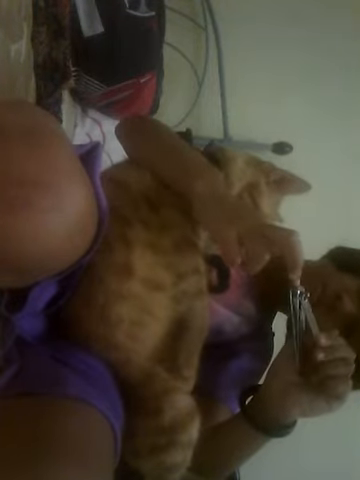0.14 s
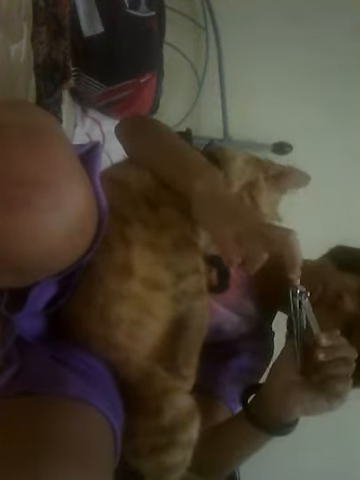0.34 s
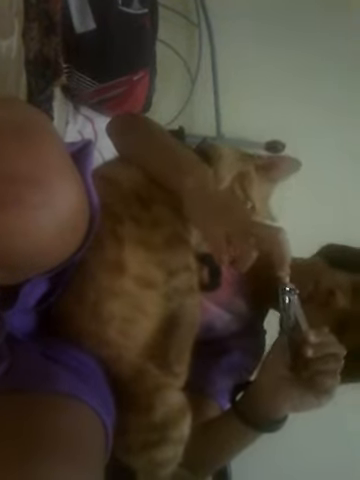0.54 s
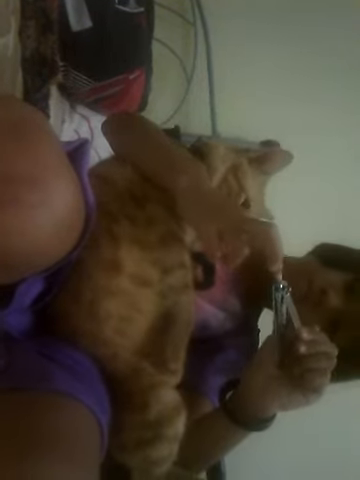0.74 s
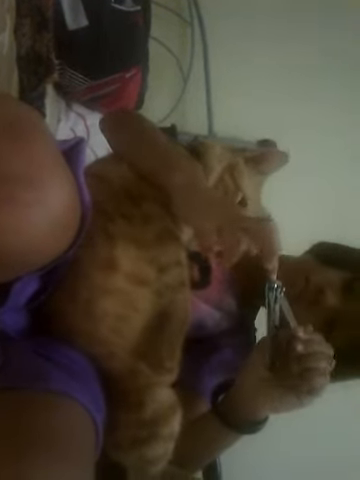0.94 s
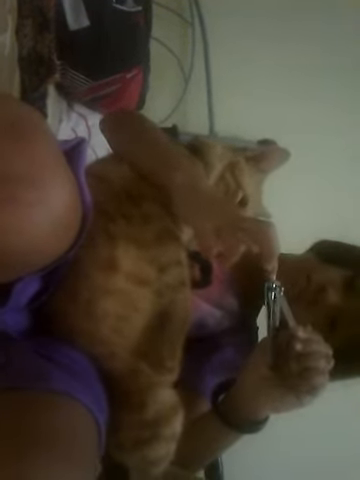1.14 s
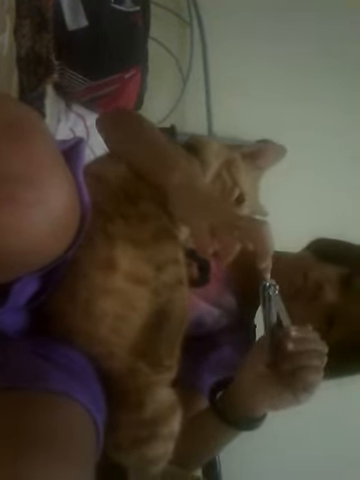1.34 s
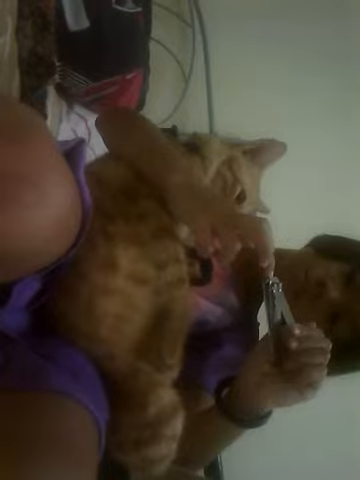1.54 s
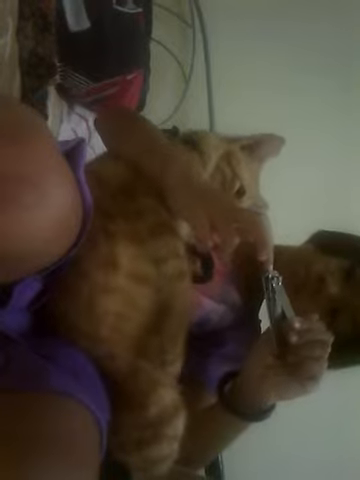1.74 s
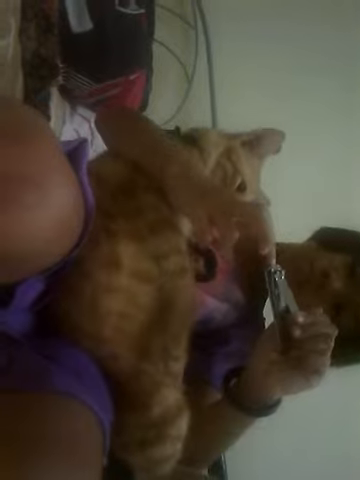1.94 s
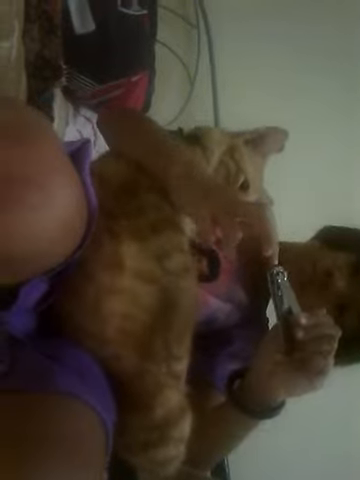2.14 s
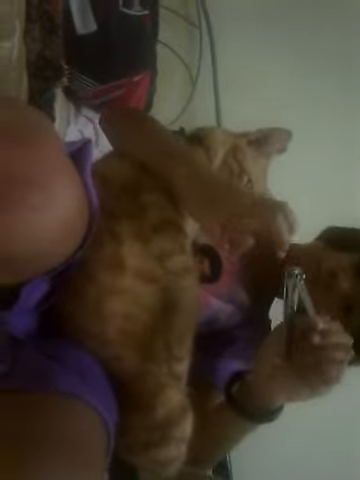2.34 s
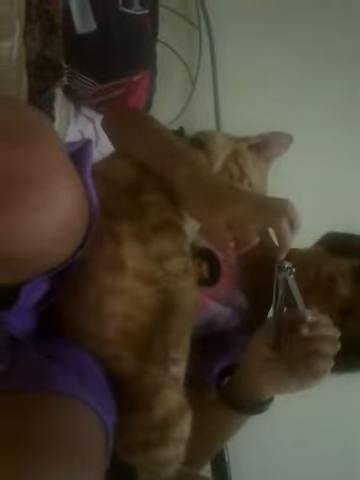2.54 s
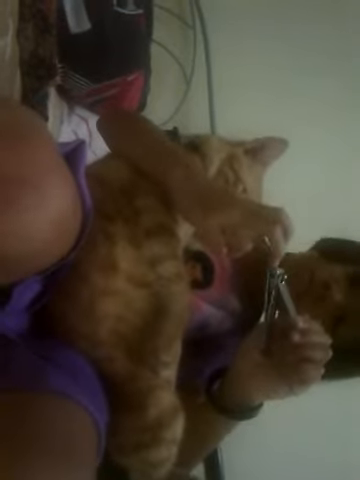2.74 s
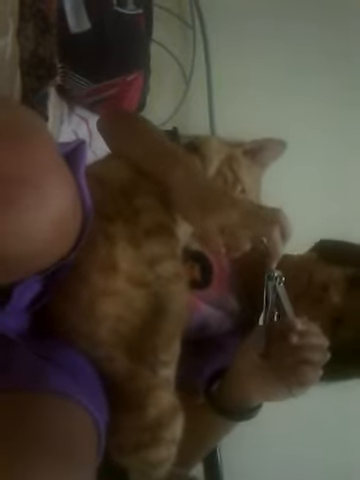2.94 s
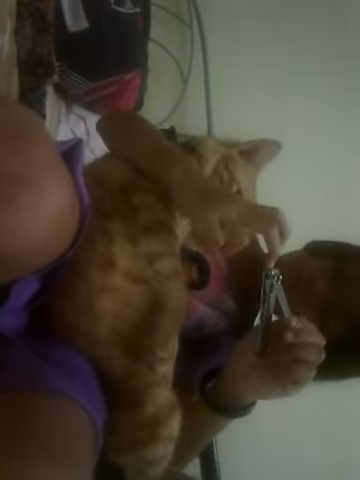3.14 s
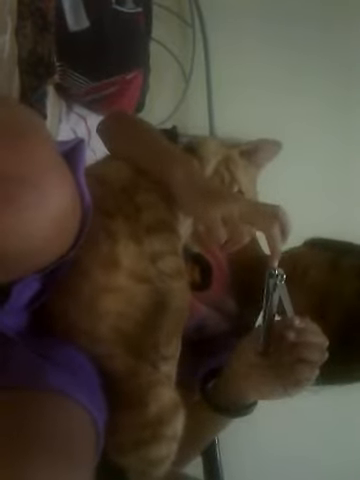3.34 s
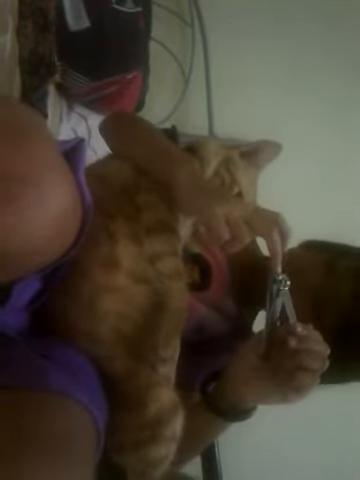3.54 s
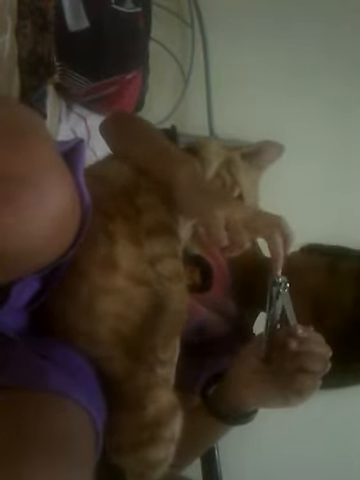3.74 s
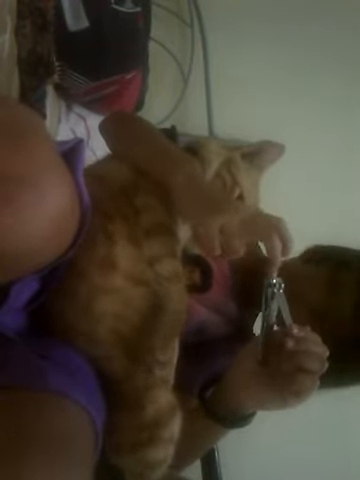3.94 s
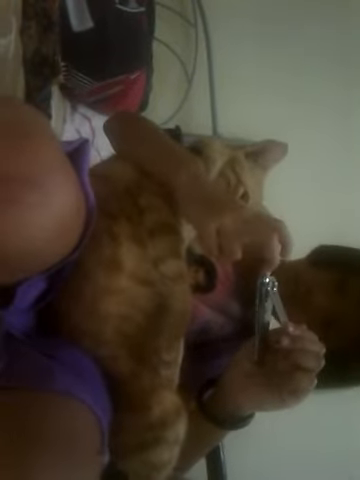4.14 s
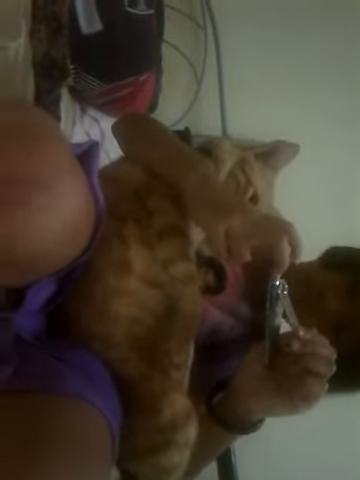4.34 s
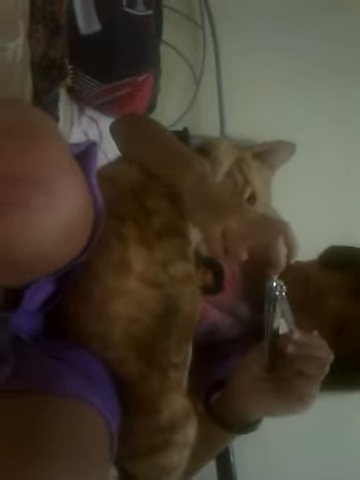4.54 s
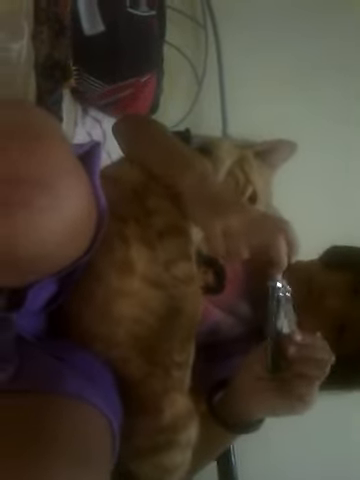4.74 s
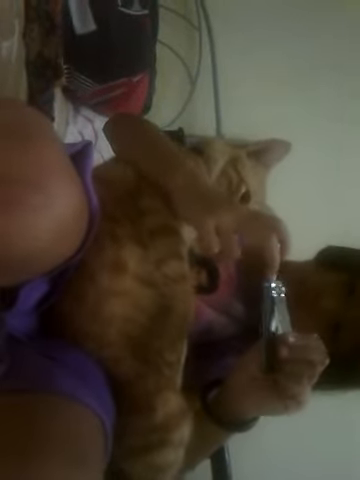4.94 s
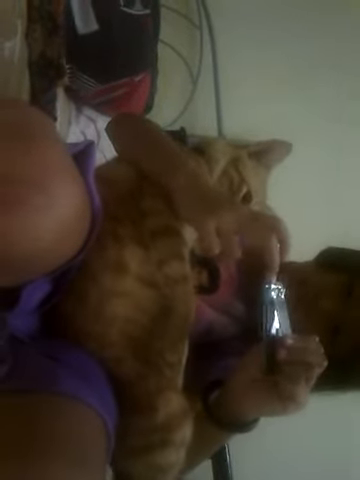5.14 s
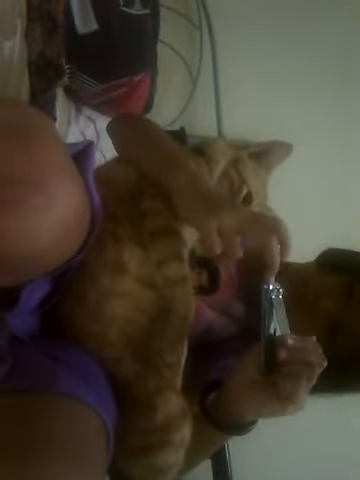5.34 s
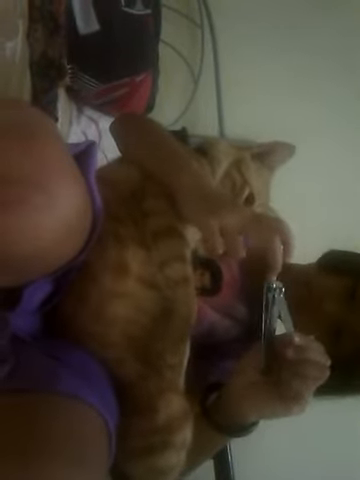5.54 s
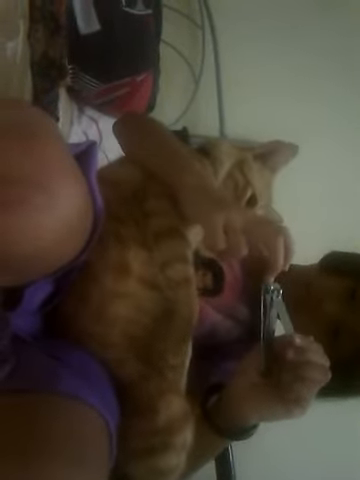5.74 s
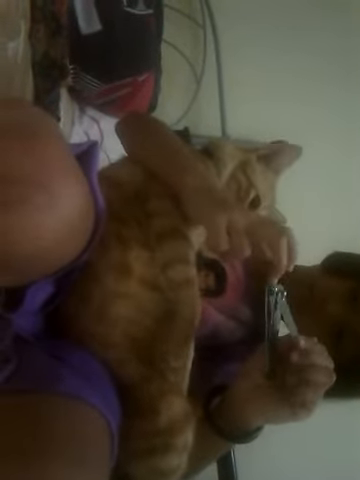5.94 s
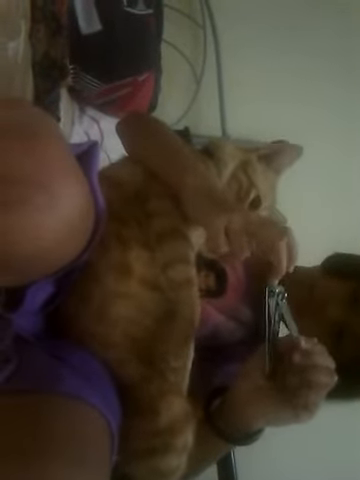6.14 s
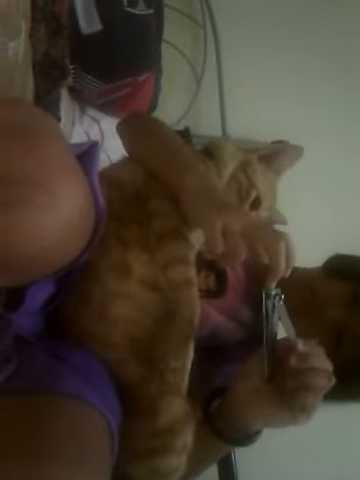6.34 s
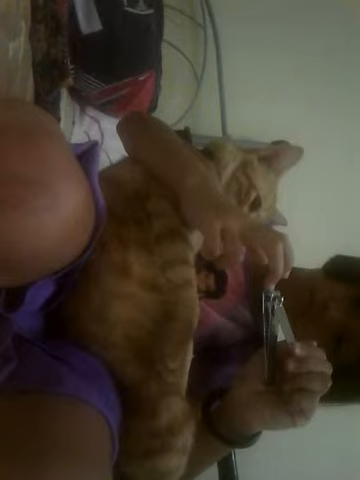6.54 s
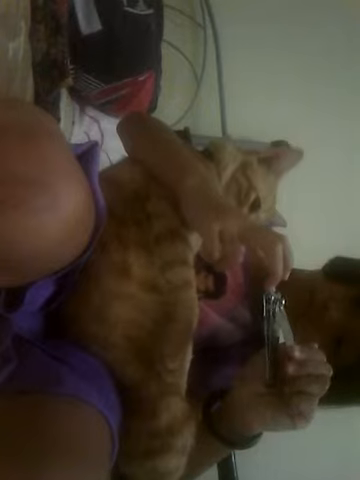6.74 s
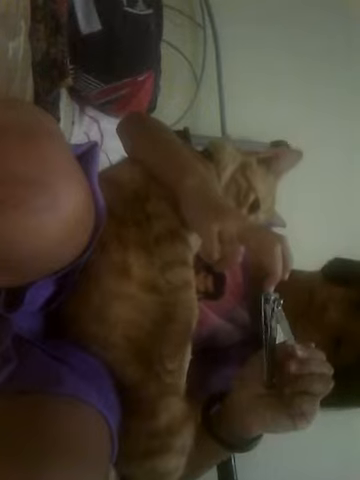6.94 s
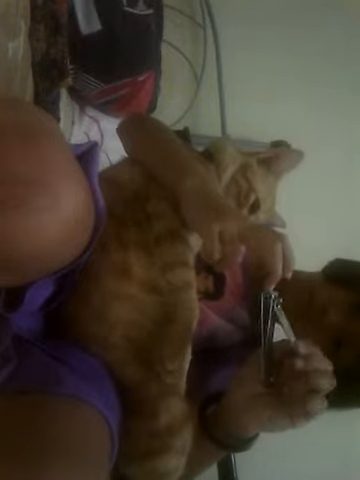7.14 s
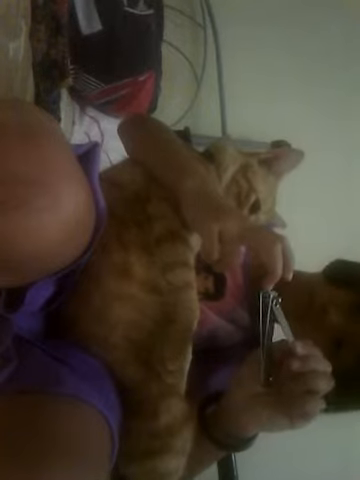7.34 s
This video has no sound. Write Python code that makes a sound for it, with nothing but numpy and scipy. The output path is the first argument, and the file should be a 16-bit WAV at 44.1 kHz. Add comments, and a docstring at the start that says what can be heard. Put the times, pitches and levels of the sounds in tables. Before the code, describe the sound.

Close to the microphone in a bare, echoing room, a steel nail clipper ticks faintly, then snaps hard through a claw. Its lever clacks twice straight after. Quiet scrapes and grip rustles follow until a second, louder snip, one clack and scattered light ticks. A soft fur brush ends it over faint hum.

```python
"""A steel lever clipper cuts two of a cat's claws in a bare, ringing room: damped steel modes swell as each claw gives.
The lever clacks with a ping, chatter and rebound; steel scrapes, brushed fur and grip shifts are coloured grains.
Behind lie faint blurred chirps, a noise rush and a fan's wavering hum; decaying echoes answer snips and clacks.
The camera's noise gate follows the treble, holding the hum down and letting it swell around treble sounds."""
import sys
import numpy as np
from scipy import signal
from scipy.fft import rfft, irfft, next_fast_len
from scipy.io import wavfile
from scipy.ndimage import uniform_filter1d

SR = 44100
rng = np.random.default_rng(int(sys.argv[2]) if len(sys.argv) > 2 else 0)


def generate_wav(signal):
    """Clip the signal to [-1, 1] and save it as 16-bit WAV at the path in sys.argv[1]."""
    frames = np.transpose(np.atleast_2d(signal))
    scaled = np.clip(frames, -1, 1) * 32767
    pcm = np.round(scaled).astype(np.int16)
    wavfile.write(sys.argv[1], SR, pcm)


N = 330436

# steel modes of the clipper: pitch_hz, width_hz, cut_db, knock_db
CLIPPER_MODES = [(3130, 250, -33, -51), (3670, 380, -24.5, -43), (4170, 160, -16, -17),
                 (5630, 820, -32, -22), (6550, 160, -25.5, -8.5), (7110, 170, -26, -4),
                 (7890, 440, -13, -7), (8400, 320, 0, -2), (9280, 420, -8, -4), (10480, 500, -19.5, -10),
                 (11480, 330, -17.5, -48), (12150, 630, -20, -11.5), (13260, 520, -19, 0.5),
                 (14170, 880, -23, -8), (14970, 570, -28.5, -39), (16000, 300, -33.5, -7.5)]


def undb(db):
    """Decibels to gain."""
    return 10 ** (np.asarray(db) / 20)


def unit(x):
    """Scale to rms 1."""
    return x / np.sqrt(np.mean(x ** 2))


def add(track, start_s, sound):
    """Mix a sound into the track at start_s."""
    i = max(int(start_s * SR), 0)
    track[i:i + len(sound)] += sound[:N - i]


def colour(x, points):
    """Shape the spectrum of x by (Hz, dB) points, interpolated over log frequency, at rms 1."""
    hz, db = np.transpose(points)
    size = next_fast_len(len(x), real=True)
    bins_hz = np.maximum(np.fft.rfftfreq(size, 1 / SR), 1)
    gain = undb(np.interp(np.log(bins_hz), np.log(hz), db))
    return unit(irfft(rfft(x, size) * gain, size)[:len(x)])


def walk(n, knots_per_s):
    """Random wander at rms 1: straight lines between Gaussian knots."""
    place = np.arange(n) / SR * knots_per_s
    knots = rng.standard_normal(1024)
    return unit(np.interp(place, np.arange(len(knots)), knots))


def grains(n, spread_db):
    """Dense tiny clicks of very unequal size, at rms 1."""
    size = undb(spread_db * rng.standard_normal(n))
    return unit(rng.standard_normal(n) * size)


def ring(modes):
    """Sum (Hz, width Hz, dB) modes after one blow; the hand damps them within milliseconds."""
    hz, width_hz, db = np.transpose(modes)[:, :, None]
    t = np.arange(1024) / SR
    side = (-1) ** np.arange(len(hz))[:, None]  # neighbouring modes swing in opposite senses
    decay = np.exp(-np.pi * width_hz * t)
    return np.sum(side * width_hz * undb(db) * decay * np.sin(2 * np.pi * hz * t), axis=0)


def clipper(strength_db, tilt_db_per_octave):
    """Ring the steel; a harder contact tilts it towards the treble."""
    hz, width_hz = np.transpose(CLIPPER_MODES)[:2]
    tilted_db = strength_db + tilt_db_per_octave * np.log2(hz / hz.mean())
    return ring(np.column_stack([hz, width_hz, tilted_db]))


def walls(t60_s=0.53, first_s=0.0045, build_s=0.0045, sparse_db=7, merge_s=0.076):
    """Answer after a short gap: separate echoes first, merging into a smooth decaying tail."""
    t = np.arange(SR // 2) / SR
    early = np.exp(-t / merge_s)
    separate = np.sqrt(early) * grains(len(t), sparse_db)
    smooth = np.sqrt(1 - early) * rng.standard_normal(len(t))
    late_s = np.maximum(t - first_s, 0)
    shape = (1 - np.exp(-late_s / build_s)) * np.exp(-np.log(1000) * late_s / t60_s)
    return (separate + smooth) * shape / shape.max()


def room(sound, echoes):
    """Play a ring through a train of echoes, keeping the train's level."""
    return signal.fftconvolve(echoes, sound / np.linalg.norm(sound))


def snips(echoes, evenness=.7, room_tilt_db=-0.3, crumble_db=-35, crumble_s=0.0061,
          claw_width_hz=1300, crack=0.13):
    """The claw gives way in about a millisecond, and the ring of the jaws swells meanwhile."""
    # claws cut through: start_s, snap_db, room_db, tilt_db_per_octave, fracture_ms, claw_hz, claw_db
    cuts = [(2.1247, -4.5, -31.5, 0, 0.62, 10150, -11), (5.2609, 0.5, -35.5, -0.5, 0.69, 13450, -9.5)]
    out, cut_db = np.zeros(N), np.array(CLIPPER_MODES)[:, 2]
    t = np.arange(1024) / SR
    for start_s, snap_db, room_db, tilt_db, fracture_ms, claw_hz, claw_db in cuts:
        swell = 1 - np.exp(-(1000 * t / fracture_ms) ** 2)
        snap = clipper(cut_db, tilt_db) * swell
        snap = snap / np.abs(snap).max()
        snap[:4] += crack * np.array([.5, .5, -0.66, -0.37])  # first split: a dry, wide-band crack
        add(out, start_s, undb(snap_db) * snap)
        # crumbling fibres and walls that gather sound from all sides bring out the modes more evenly
        steel = clipper(evenness * cut_db, tilt_db + room_tilt_db)
        spread = steel + ring([(claw_hz, claw_width_hz, claw_db)])
        fibres = grains(len(t), spread_db=3.5) * np.exp(-t / crumble_s)
        add(out, start_s, undb(snap_db + crumble_db) * room(spread, fibres))
        add(out, start_s, undb(room_db) * room(spread, echoes))
    return out


def clacks(echoes, chatter_s=0.0085, chatter=.07, tick=.45, unevenness_db=4):
    """The loose lever knocks on its pin with a dry tick, pings, chatters and rebounds once."""
    # lever knocks: start_s, peak_db, room_db, ping_hz (depends on where the lever is held)
    knocks = [(.004, -30.5, -51, 2620), (.182, -39.5, -63, 2500), (0.457, -37.5, -63.5, 1490),
              (2.1893, -11.5, -43, 2540), (2.2164, -12.5, -38, 2505), (5.3954, -17.5, -36.5, 3070),
              (5.474, -31, -60, 2560), (5.605, -32, -48, 3050), (6.337, -34.5, -50, 2380),
              (6.353, -38.5, -51, 2410), (6.42, -36.5, -48.5, 3000), (6.463, -37.5, -56, 3060),
              (6.667, -29.5, -40.5, 3040), (7.248, -39.5, -63, 3600)]
    ping_width_hz, ping_db = 56, -12.5
    bounce_s, bounce_db = .007, -7.5
    # a knock that fills the room more is harder and brighter: tilt per dB above the plain room level
    plain_room_db, tilt_per_db = -44, 0.35
    out, knock_db = np.zeros(N), np.array(CLIPPER_MODES)[:, 3]
    t = np.arange(512) / SR
    for start_s, peak_db, room_db, ping_hz in knocks:
        steel = clipper(knock_db, tilt_per_db * (room_db - plain_room_db))
        blow = steel + ring([(ping_hz, ping_width_hz, ping_db)])
        blow[:2] += tick * np.abs(blow).max() * np.array([1, -1])
        for delay_s, loss_db in [(0, 0), (bounce_s, bounce_db)]:
            contact = chatter * grains(len(t), unevenness_db) * np.exp(-t / chatter_s)
            contact[0] = 1
            knock = np.convolve(contact, blow)
            add(out, start_s + delay_s, undb(peak_db + loss_db) * knock / np.abs(knock).max())
        add(out, start_s, undb(room_db) * room(blow, echoes))
    return out


def strokes(table, rise, spectrum, grain_db, catch_db, catches_per_s):
    """Friction: tiny slips under a swell for each stroke, catching and letting go."""
    out, t = np.zeros(N), np.arange(-SR // 4, SR // 4) / SR
    share = np.clip(np.where(t < 0, rise, 1 - rise), .01, 1)
    for height_s, length_s, level_db in table:
        catching = undb(catch_db * walk(len(t), catches_per_s))
        slips = colour(grains(len(t), grain_db) * catching, spectrum)
        swell = np.exp(-.5 * (t / (share * length_s)) ** 2)
        add(out, height_s + t[0], undb(level_db) * slips * swell)
    return out


def scrapes():
    """Steel slides on claw in fine, bright slips."""
    # strokes: height_s, length_s, level_db
    slides = [(1.49, 0.078, -55.5), (1.905, 0.11, -56.5), (3.39, .075, -55.5), (3.56, 0.14, -57),
              (4.27, 0.21, -58.5), (4.40, 0.078, -55.5), (4.50, 0.14, -57.5), (4.635, 0.064, -57),
              (4.945, 0.17, -57), (5.20, 0.16, -52.5), (6.925, 0.082, -55.5), (7.37, 0.06, -57)]
    # spectrum: pitch_hz, density_db_per_hz
    spectrum = [(300, -14), (2000, -21.5), (5500, -23.5), (7000, -4.5), (8200, -2.5), (9400, 3),
                (10400, -19.5), (16000, -21.5)]
    return strokes(slides, 0.38, spectrum, grain_db=5.0, catch_db=0.75, catches_per_s=180)


def fur(swish_hz=6200):
    """Hairs slip under the fingers with a soft swish."""
    # strokes of the hand: height_s, length_s, level_db, rise_share
    brushes = [(2.768, .16, -55, 0.42), (4.286, 0.11, -61, 0.5), (5.764, 0.22, -63, .35),
               (7.393, 0.066, -44.5, 0.03)]
    # spectrum: multiple_of_swish_hz, density_db_per_hz
    swish = np.array([(.05, -35), (.3, -22), (.6, -13.5), (.82, -2.5), (1, -5.5), (1.2, -7.5), (1.5, -10),
                      (1.9, -27), (2.8, -49)]) * [swish_hz, 1]
    return sum(strokes([stroke], rise, swish, grain_db=6.5, catch_db=0.2, catches_per_s=310)
               for *stroke, rise in brushes)


def shifts():
    """The grip on the paw shifts in low, uneven slips."""
    # shifts: height_s, length_s, level_db
    grips = [(.70, 0.24, -51), (1.10, 0.12, -55), (2.59, 0.018, -52), (2.77, 0.39, -56.5),
             (4.39, 0.08, -46.5), (4.485, 0.091, -51), (4.905, 0.028, -52.5), (5.33, .3, -59.5),
             (6.33, 0.39, -58.5)]
    # spectrum: pitch_hz, density_db_per_hz
    spectrum = [(30, -22), (70, -9), (140, -2.5), (290, -2), (600, -10), (1200, -16), (2600, -25),
                (6000, -23.5), (10000, -20.5), (13000, -29), (16000, -28)]
    return strokes(grips, 0.35, spectrum, grain_db=6, catch_db=2.0, catches_per_s=180)


def chirps(blur_knots_per_s=500, width_s=.04, level_db=-63):
    """Thin far-off notes, blurred by the walls into narrow bands."""
    # notes: height_s, pitch_hz
    notes = [(.53, 3950), (1.61, 4680), (1.818, 4300), (2.041, 5010), (3.525, 3300), (3.66, 1450),
             (3.847, 4450), (5.9, 4500), (6.203, 1975)]
    out, t = np.zeros(N), np.arange(-SR // 8, SR // 8) / SR
    swell = np.exp(-(t / width_s) ** 2)
    for height_s, hz in notes:
        blur = walk(len(t), blur_knots_per_s) + 1j * walk(len(t), blur_knots_per_s)
        note = np.real(blur * np.exp(2j * np.pi * hz * t))
        add(out, height_s + t[0], undb(level_db) * swell * note)
    return out


def air(rush_db=-55, hum_hz=297.2, hum_db=-63.5):
    """Steady coloured-noise rush of the room with a fan's hum, its phase wandering."""
    # spectrum of the rush: pitch_hz, density_db_per_hz
    spectrum = [(25, -29.5), (45, -19), (70, -11), (130, -6), (260, -2.5), (370, -5), (480, -10),
                (700, -9.5), (1200, -17.5), (2100, -22.5), (4200, -21), (6500, -22), (8600, -18),
                (12000, -26.5), (16000, -31)]
    rush = colour(rng.standard_normal(N), spectrum)
    t = np.arange(N) / SR
    wander_rad = .7 * walk(N, knots_per_s=15)
    hum = np.sqrt(2) * np.sin(2 * np.pi * hum_hz * t + wander_rad)
    return undb(rush_db) * rush + undb(hum_db) * hum


def scene():
    """Clipper, hands and fur over chirps and the room's air."""
    echoes = walls()
    steel = snips(echoes) + clacks(echoes) + scrapes()
    hands = fur() + shifts()
    return (steel + hands + chirps() + air())[None]


def gate(x, shut_db=-60.0, span_db=11, depth_db=16.0, low_hz=2000, high_hz=11000, window_s=0.0093):
    """A soft noise gate: it follows the treble and turns everything down as that fades."""
    band_hz = [low_hz, min(high_hz, .45 * SR)]
    treble = signal.sosfilt(signal.butter(2, band_hz, "band", fs=SR, output="sos"), x)
    size = max(int(window_s * SR), 1)
    power = uniform_filter1d(treble ** 2, size, origin=size // 5)  # window set off-centre
    power_db = 10 * np.log10(np.maximum(power, 1e-12))
    opening = np.clip((power_db - shut_db) / span_db, 0, 1)
    return x * undb(-depth_db * np.cos(np.pi / 2 * opening) ** 2)


def record(dry):
    """The camera gates the sound, cuts the top and adds a tiny offset."""
    top_hz, offset = 15750, -.0004
    low_pass = signal.ellip(10, .2, 80, top_hz, fs=SR, output="sos")
    return signal.sosfilt(low_pass, gate(dry)) + offset


dry = scene()
out = record(dry)
generate_wav(out)
```